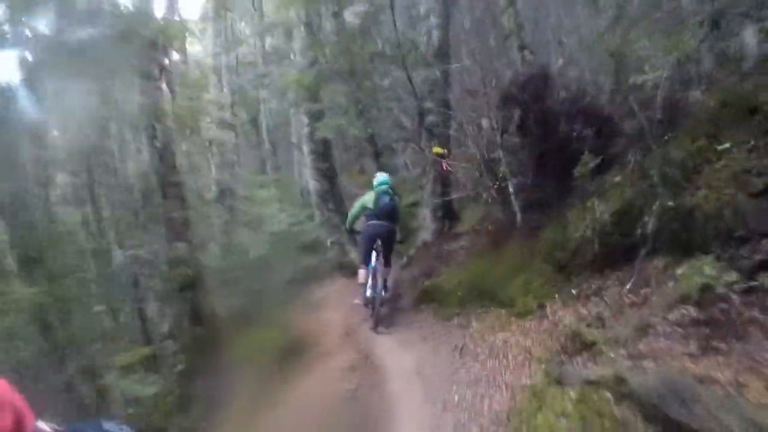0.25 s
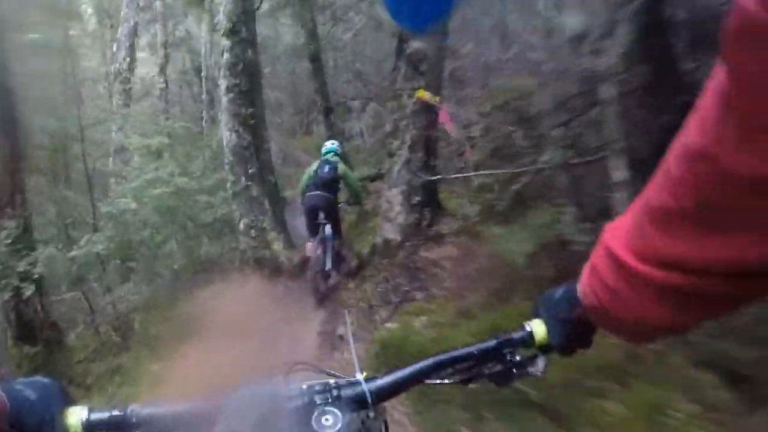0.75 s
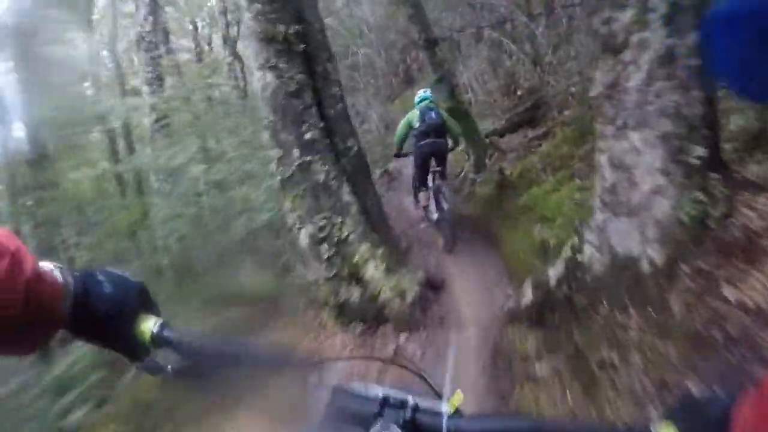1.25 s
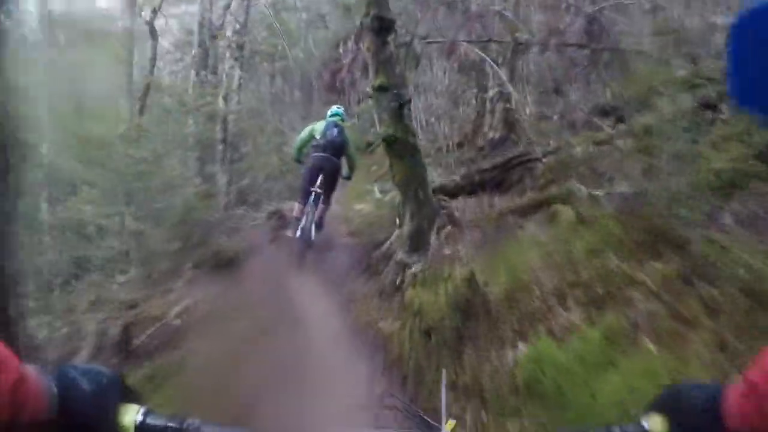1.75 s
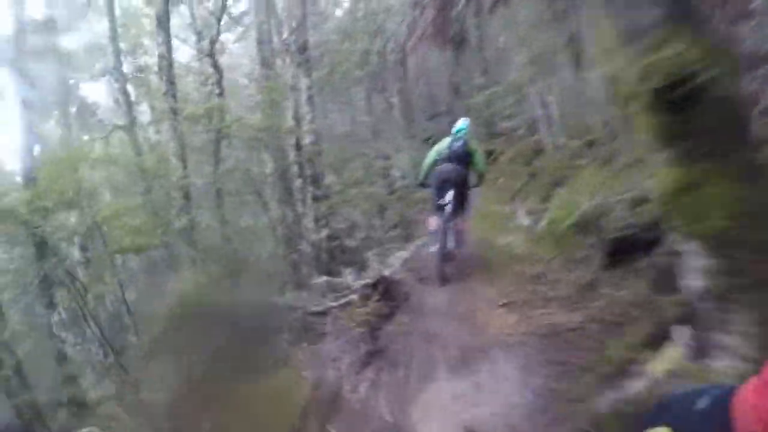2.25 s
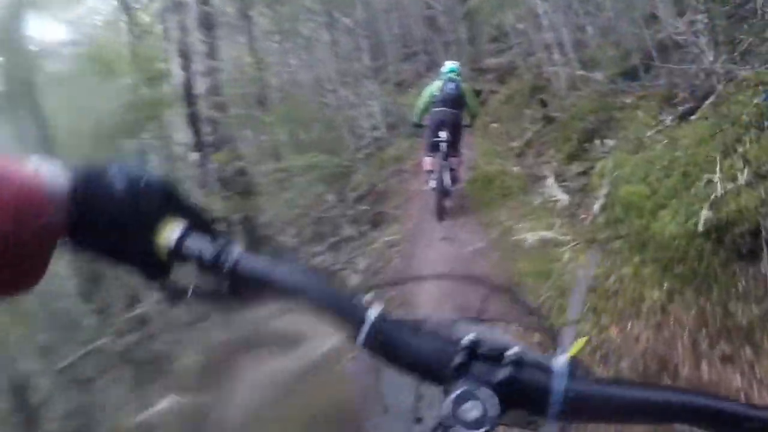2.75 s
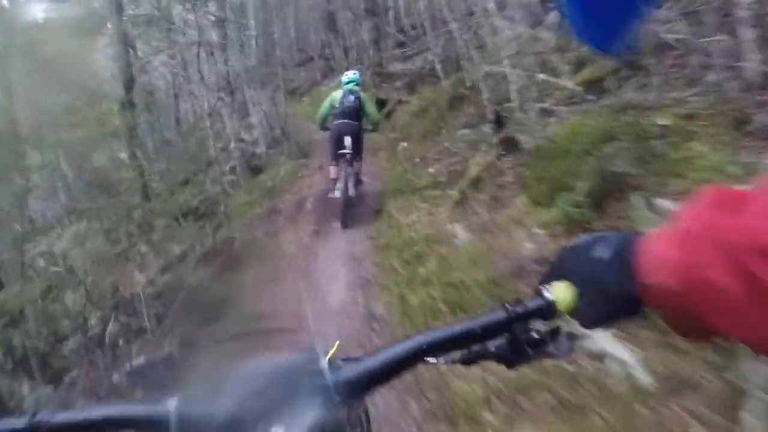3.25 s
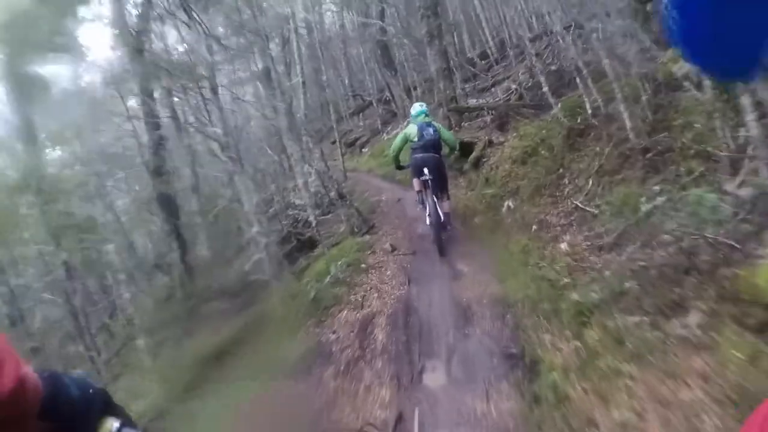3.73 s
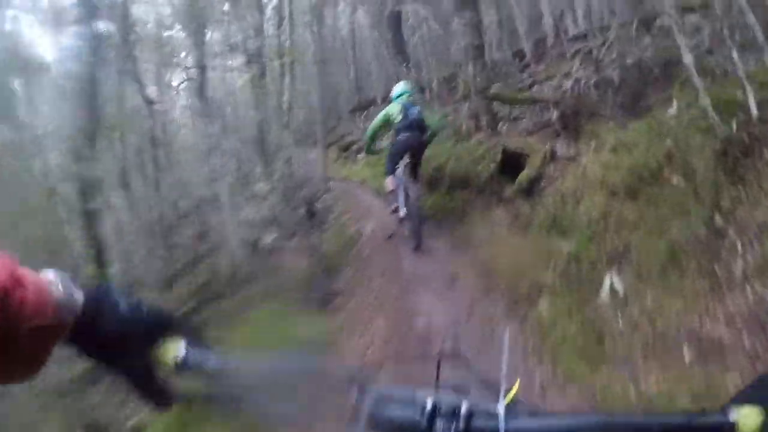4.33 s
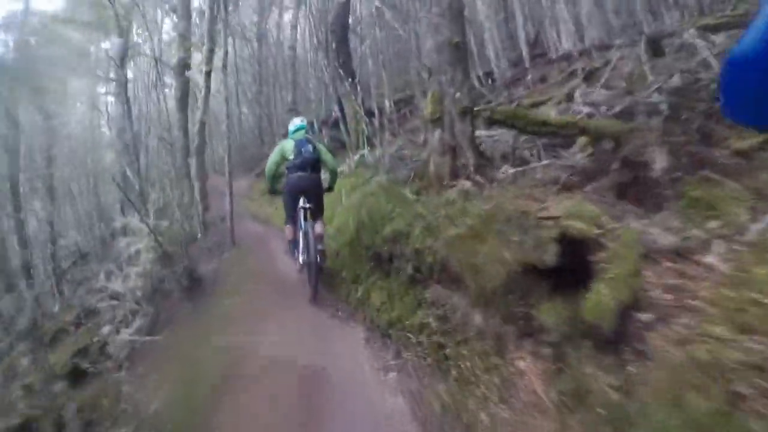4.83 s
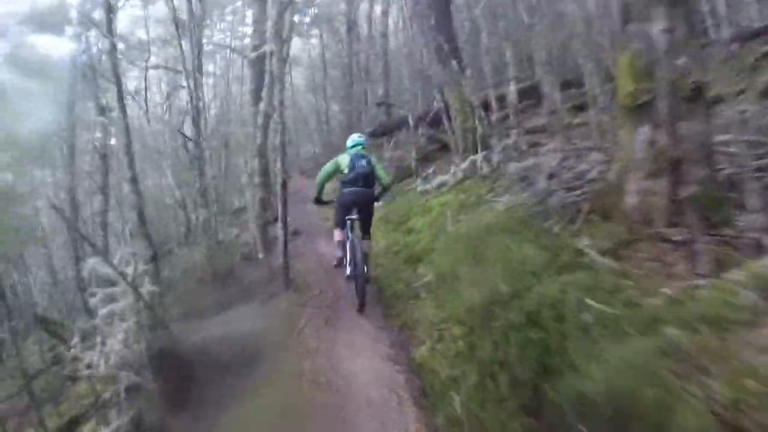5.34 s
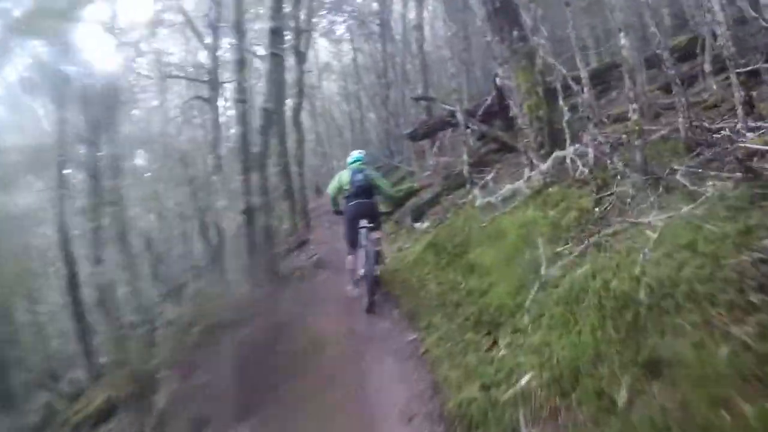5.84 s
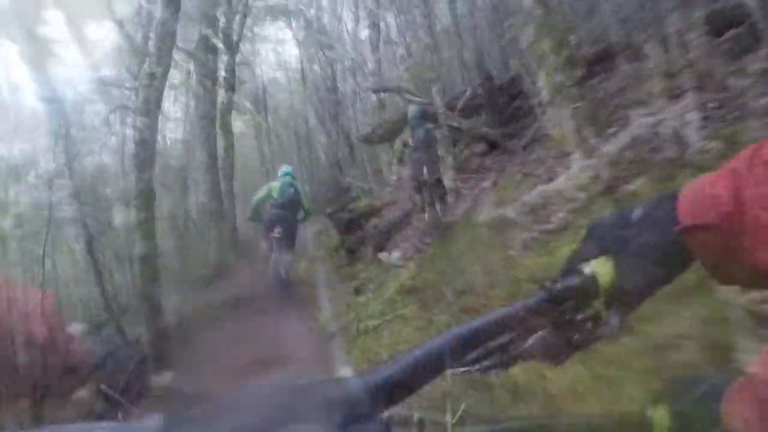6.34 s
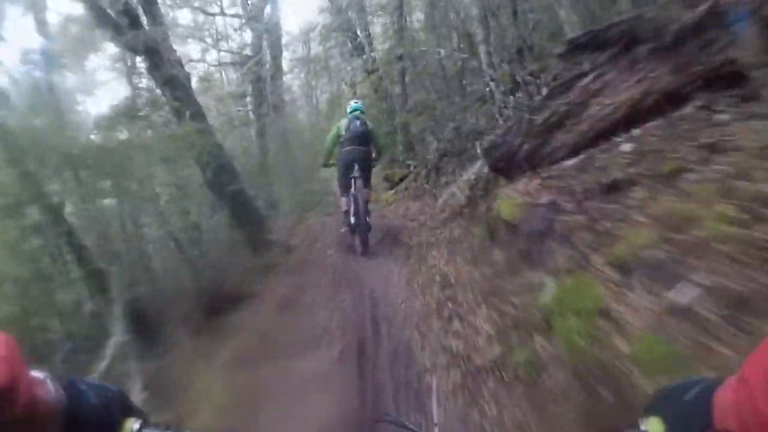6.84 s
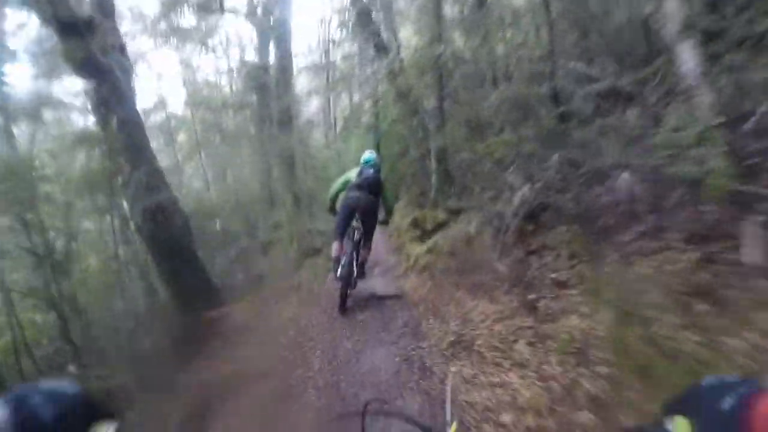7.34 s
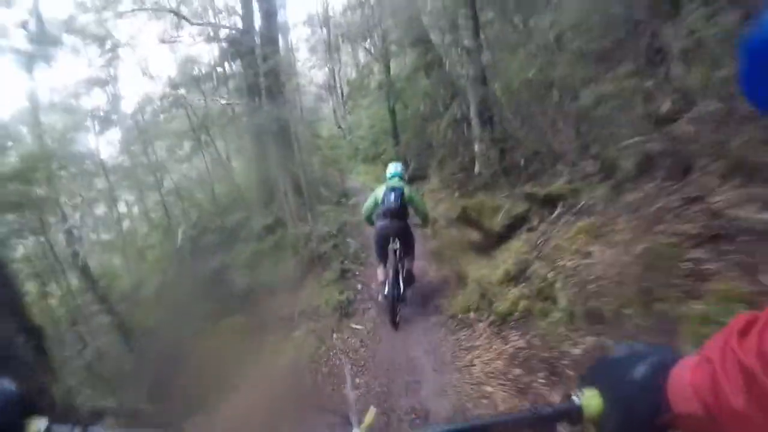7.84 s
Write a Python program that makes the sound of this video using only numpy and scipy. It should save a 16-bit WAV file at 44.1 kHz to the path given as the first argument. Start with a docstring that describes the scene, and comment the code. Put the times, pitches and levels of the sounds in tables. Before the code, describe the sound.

Bicycle disc brakes squeal in fluttering throbs for over a second, then wind buffets the microphone while tyres hiss and crunch along muddy forest trail.

```python
"""Both disc brakes of a bicycle squeal in throbs on a muddy forest trail, over hiss and crunch of tyres.
The camera rides on the rider, close to it all: wind buffets its ports, grit ticks, hard bumps thump, a rattle is faint.
It opens from one microphone to a stereo pair and later snaps back.
Squeals are sums of fluttering multiples of a slip rate; wind and tyres are coloured noise with moving levels;
ticks are filtered noise bursts, thumps short low sines, and the rattle is random knocks on ringing modes."""
import sys
import numpy as np
from scipy import signal
from scipy.fft import rfft, irfft, next_fast_len
from scipy.io import wavfile
from scipy.ndimage import uniform_filter1d, minimum_filter1d

SR = 44100
rng = np.random.default_rng(int(sys.argv[2]) if len(sys.argv) > 2 else 0)


def inscribe(sig):
    """Save sig as 16-bit PCM at rate SR to the path in sys.argv[1].

    A 1-D sig is mono; a 2-D sig holds one channel per row.
    Samples are clipped to [-1, 1] before scaling.
    """
    pcm = np.round(np.clip(np.atleast_2d(sig).T, -1, 1) * 32767)
    wavfile.write(sys.argv[1], SR, pcm.astype(np.int16))


N = 356328

# Loudest throbs, each one partial of a brake disc swelling and dying:
# (centre [s], width [s], mid frequency [Hz], glide from start to end [Hz], peak [dB])
BRAKE_THROBS = [(0.036, 0.032, 1105, 36, -18), (0.091, 0.02, 1080, -72, -14), (0.303, 0.025, 1070, 34, -19),
                (0.335, 0.018, 549, 3, -15.5), (0.392, 0.029, 1023, -60, -10),
                (0.652, 0.025, 1044, 3, -10.5), (0.692, 0.051, 514, 15, -14.5),
                (0.717, 0.029, 1054.0, 22, -9), (0.755, 0.025, 1054, 8, -13), (0.794, 0.037, 527, 1, -12.5),
                (0.785, 0.02, 1343, 18, -21.5), (0.823, 0.02, 1403, 53, -15.5),
                (0.862, 0.024, 1484, 90, -25), (0.898, 0.03, 1372, -8, -21),
                (0.838, 0.0434, 1042, -36, -11), (0.855, 0.017, 534, 3, -14),
                (0.902, 0.029, 532.6, 12, -15.0), (0.932, 0.028, 1098, 65, -12),
                (0.998, 0.058, 525, -3, -17), (1.002, 0.08, 1370, -5, -13),
                (1.056, 0.054, 1040, -10, -17.5), (1.142, 0.039, 1047, 11, -12),
                (1.214, 0.033, 1085, 60, -17), (1.225, 0.036, 2200, 170, -35)]
# First brake (two pulls), its rising release, and the second brake, one table each:
# (time [s], slip rate of the pads [Hz], level between throbs [dB], bite of the upper orders [dB])
BRAKE_PULLS = [
    [(0, 539.6, -31, -20), (.12, 522.4, -26.5, -5), (.28, 532, -31, -14), (.4, 521, -26, -7.5),
     (.46, 534, -27.5, -7), (.51, 540.3, -35.5, -29), (.59, 530, -30, -5), (.68, 523.2, -26, 4),
     (.9, 529.5, -27, -11), (1.02, 523.3, -28, -0.5), (1.17, 527.3, -27, -5), (1.23, 520, -53, -14)],
    [(1.18, 516, -25.5, -4), (1.245, 570, -38, -13), (1.275, 558, -28, -33), (1.31, 557, -41.5, -23),
     (1.46, 559, -49, -25)],
    [(.6, 681, -43, -12), (.75, 683, -30, -20), (1.0, 674, -28.5, -13), (1.2, 678, -30, -13),
     (1.33, 681, -43.5, -9), (1.62, 701, -46.5, -9), (1.72, 690, -51, -9)],
]
# Per squeal: (level of multiples 1, 2, 3 .. of the slip rate [dB])
SLIP_ORDERS = [
    [6, 1.5, -1, -17, -7.5, -14, -9.5, -9.5, -12, -17, -19.5, -22.5, -23.5],
    [3, 6.5, -21, 0],
    [4.5, 1, -17, -23],
]
# Per squeal: (first of the upper orders [multiple])
FIRST_UPPER_ORDER = [6, 4, 5]
# Per squeal: (depth of its flutter [factor])
FLUTTER_DEPTH = [0.67, 0.47, 0.48]
# Grit between pads and disc: (frequency [Hz], relative density [dB per Hz])
RASP_SPECTRUM = [(1800, -28), (3000, 3), (4500, 5), (6000, -13), (8000, -39)]
RASP_DB = -11  # against the squeal, before the bite
DRIFT_SHARE, DRIFT_PER_S = 0.007, 53  # slow drift of the slip rate

# Changing airflow at the left port between the short gusts, with one slow swell near 6 s;
# the left port is also the single microphone: (time [s], buffeting [dB])
AIRFLOW_LEFT = [(0.1, -27.5), (0.6, -29.5), (1.1, -29), (1.55, -26.5), (2.5, -24), (3.74, -21.5),
                (4.78, -31), (5.46, -24.5), (6.03, -9), (6.26, -19.5), (6.6, -27), (6.78, -27),
                (7.12, -25.5), (7.26, -23), (7.33, -29.5), (7.6, -37.5), (7.82, -23.5), (8.04, -26)]
# Airflow at the right port: (time [s], buffeting [dB])
AIRFLOW_RIGHT = [(1.58, -20), (1.94, -24), (2.24, -41), (2.32, -23), (2.78, -24), (2.96, -17.5),
                 (3.32, -42), (3.96, -19.5), (4.58, -46), (4.68, -15.5), (4.78, -36), (5.48, -33),
                 (5.58, -20), (5.84, -25.5), (6.46, -23)]
# Slow deep pressure swings at both ports: (time [s], level [dB])
PRESSURE_SWAY = [(0, -20), (.3, -23.5), (1, -25), (2, -23.5), (7.27, -28), (7.33, -51), (7.62, -27),
                 (7.72, -16.5), (8, -24)]
# Short gusts at the left port: (start [s], hold [s], buffeting [dB], rush above the buffeting [dB],
# sag of the rush [dB per s])
WIND_GUSTS = [(1.745, 0.53, -15.5, -1, 19), (2.62, 0.3, -21, -17, 28), (2.93, 0.61, -13.5, 2, 15.5),
              (3.755, 0.17, -20, -3, 4), (4.082, 0.5, -12.5, 2, 8.5), (4.831, 0.086, -16.5, -10, 15),
              (5.052, 0.26, -15.5, -9, 28), (6.265, 0.099, -15.5, -1.5, 1), (6.854, 0.039, -16, -10.5, 3),
              (7.416, 0.065, -23.5, -14, 0), (7.85, 0.1, -27.5, -1, 18)]
# Low buffeting of the ports: (frequency [Hz], relative density [dB per Hz])
BUFFET_SPECTRUM = [(20, -0.5), (45, -9), (75, 3), (125, 1), (200, -5.5), (310, -15), (1500, -99)]
# Higher rush of air over the ports: (frequency [Hz], relative density [dB per Hz])
RUSH_SPECTRUM = [(60, -72), (150, -6.5), (250, 0.5), (450, -7.5), (800, -23.5), (1200, -34), (4000, -84)]
LEFT_RUSH_DB, RIGHT_RUSH_DB = -16.5, -9.5  # against the buffeting: left between gusts, right
GUST_RISE_S, GUST_FALL_DB_PER_S = 0.042, 186
GUST_SAG_DB_PER_S = -1  # negative: held buffeting grows

# Rolling between the splashes:
# (time [s], hiss of the tread in wet mud [dB], crunch of loose ground above the hiss [dB])
ROLLING = [(0.02, -38, 5.5), (0.22, -46, 13), (0.44, -39, 2.5), (0.92, -40.5, 0), (1.24, -38.5, 1.5),
           (1.5, -32.5, -7.5), (2.12, -33.5, -8), (2.36, -37, -1), (3.1, -38, 1), (3.74, -34.5, -11),
           (4.16, -37, 1), (4.62, -37, -9), (4.98, -33.5, -6.5), (5.42, -35, -6.5), (5.9, -33, -5.5),
           (6.5, -39.5, -5), (7.06, -29, -2), (7.38, -38, -1.5), (8.06, -34.5, -1)]
# Tyres splash through wet patches and grind over loose ones: (start [s], hold [s], hiss [dB], crunch [dB])
WET_AND_LOOSE_PATCHES = [(0.093, 0.024, -32, -32.5), (0.562, 0.21, -35.5, -36), (0.99, 0.066, -39, -40),
                         (2.456, 0.26, -28.5, -57), (2.752, 0.11, -24.5, -48), (3.29, 0.13, -29, -51),
                         (3.76, 0.18, -42, -33), (4.077, .01, -34.5, -33.5), (4.283, 0.14, -31, -62),
                         (4.638, 0.0082, -39, -37), (5.929, 0.089, -30.5, -36.5), (6.141, 0.31, -29, -36),
                         (7.633, 0.03, -36, -42), (7.924, 0.026, -53, -39)]
# Crunch of loose ground: (frequency [Hz], relative density [dB per Hz])
CRUNCH_SPECTRUM = [(300, 9.5), (1150, 4), (1650, 2.5), (2500, 1.5), (3300, 0), (6000, -28.5)]
# Hiss through the single microphone: (frequency [Hz], relative density [dB per Hz])
HISS_ONE_MIC = [(1500, -17), (2890, -15.5), (4090, 3.5), (5850, 2.5), (7370, -9), (8900, -14.5),
                (10900, -31), (12800, -18), (15300, -32)]
# Hiss through the stereo pair: (frequency [Hz], relative density [dB per Hz])
HISS_STEREO = [(1500, -21), (3300, -4.5), (4700, -4.5), (6300, 2.5), (7580, -5), (8510, -12),
               (11500, -21.5), (15300, -33)]
# Tyre sound at the two ports: (frequency [Hz], left-right likeness [0 to 1], lead of the left [radians])
PORT_LIKENESS = [(900, .3, 0), (2500, .72, 0), (4200, .82, .2), (6000, .55, 1.1), (8000, .48, 1.7),
                 (10000, .1, 2.5)]
# Changing level of the treble above TREBLE_HZ, some values below zero: (time [s], change [dB])
TREBLE_CHANGE = [(0, 1), (1.0, 4), (1.7, 7), (2.0, 7), (2.9, 0), (3.2, -2), (5.6, -2), (6.0, -1), (6.7, 4),
                 (7.0, 7.5), (7.4, 6), (8, 3)]
TREBLE_HZ = 11500
SPLASH_RISE_S, SPLASH_FALL_DB_PER_S, SPLASH_SAG_DB_PER_S = 0.015, 111, 5
FRAME = 512  # samples in one short-time spectrum

# Grit and twigs tick on frame and camera: (time [s], peak [dB], nominal pitch [Hz])
GRIT_TICKS = [(.185, -33, 7000), (.99, -33, 6500), (1.387, -18, 2240), (1.628, -15, 2620),
              (2.311, -18.5, 2100), (2.746, -23, 6440), (3.013, -22, 2430), (3.114, -16.5, 1170),
              (3.37, -29, 5920), (3.768, -24, 2540), (3.842, -11, 2820), (4.188, -29, 5850),
              (4.215, -18, 1100), (4.709, -13.5, 5700), (4.72, -7, 5000), (5.281, -17, 2040),
              (5.567, -22.5, 2000), (5.864, -22, 4000), (5.903, -24, 4530), (5.94, -22, 6000),
              (6.438, -12.5, 2820), (7.617, -18.5, 3040), (7.761, -19.5, 3980), (7.964, -19, 2290)]
# Hard gusts and bumps felt by both ports: (time [s], peak [dB], frequency [Hz])
LOW_THUMPS = [(2.313, -14.5, 112), (3.106, -12, 173), (3.68, -19.5, 262), (3.842, -9, 237),
              (4.699, -16.5, 268), (6.416, -15, 189), (6.83, -6.5, 93), (6.913, -8.5, 170),
              (7.507, -15.5, 158), (7.798, -11, 65.5), (7.899, -10, 99)]
# Something loose on the frame over rough ground: (start [s], length [s], middle mode [Hz], level [dB])
FRAME_RATTLES = [(3.755, 0.21, 2700, -39.5), (5.377, 0.48, 3050, -41.5), (7.886, .2, 2380, -42.5)]
KNOCKS_PER_S, KNOCK_T60_S, MODE_SPACING = 500, .01, .1  # spacing as a share of the middle mode

# The camera opens and closes its stereo: (time [s], share of the pair [0 to 1])
STEREO_SHARE = [(1.6, 0), (1.78, 1), (6.452, 1), (6.46, 0)]
EDGE_HZ = 15400  # upper band limit of the camera


def gain_of(db):
    """Decibels to a factor."""
    return 10 ** (np.asarray(db) / 20)


def evened(x):
    """Scales to rms 1."""
    return x / np.sqrt(np.mean(abs(x) ** 2) + 1e-20)


def columns(rows, t):
    """Every column of a table, interpolated at the times t."""
    s, *rest = np.transpose(rows)
    return [np.interp(t, s, c) for c in rest]


def colour(points, hz):
    """Every column of a spectrum, interpolated over log frequency."""
    log_points = [(np.log(p[0]), *p[1:]) for p in points]
    return columns(log_points, np.log(hz + 1))


def wander(per_s, count=N):
    """Smooth chance of rms 1 that turns about per_s times a second."""
    size = int(SR / per_s)
    smooth = uniform_filter1d(rng.standard_normal(count), size)
    return evened(uniform_filter1d(smooth, size))


def noise(points, count=N):
    """Steady noise of rms 1 with the given spectrum."""
    size = next_fast_len(count, real=True)
    db = colour(points, np.fft.rfftfreq(size, 1 / SR))[0]
    shaped = rfft(rng.standard_normal(size)) * gain_of(db)
    return evened(irfft(shaped, size)[:count])


def mix_in(mix, s, sound):
    """Mixes a sound in from second s."""
    part = mix[..., max(round(s * SR), 0):][..., :sound.shape[-1]]
    part += sound[..., :part.shape[-1]]


def swells(t, base_db, starts, holds, tops_db, rise_s, fall_db_per_s, sag_db_per_s):
    """Adds to a base level the power of events that rise, sag while held, then fall; in dB."""
    power = gain_of(2 * base_db)
    for start, hold, top_db, sag in np.broadcast(starts, holds, tops_db, sag_db_per_s):
        since = np.maximum(t - start - rise_s, 0)
        db = top_db - sag * np.minimum(since, hold) - fall_db_per_s * np.maximum(since - hold, 0)
        rise = np.clip((t - start) / rise_s, 0, 1)
        power = power + (rise * gain_of(db)) ** 2
    return 10 * np.log10(power)


def squeal(rows, orders_db, first_upper, depth):
    """Pads stick and slip unevenly; every order flutters on its own, the lowest least."""
    t = np.arange(rows[0][0], rows[-1][0], 1 / SR)
    count = len(t)
    slip_hz, level_db, bite_db = columns(rows, t)
    jitter = 0.00624 * wander(225, count)
    drift = DRIFT_SHARE * wander(DRIFT_PER_S, count)
    turns = np.cumsum(slip_hz * (1 + jitter + drift)) / SR
    out = np.zeros(count)
    for k, db in enumerate(orders_db, start=1):
        # complex, so that strength and phase both flutter
        chance = wander(91, count) + 1j * wander(95, count)
        flutter = 0.73 + depth * min(k, 3) / 2 * chance
        order_db = db + bite_db * (k >= first_upper)
        out += gain_of(order_db) * (flutter * np.exp(2j * np.pi * k * turns)).real
    puffs = 1 + np.cos(2 * np.pi * turns)  # one puff of rasp per slip
    out += gain_of(RASP_DB + bite_db) * noise(RASP_SPECTRUM, count) * puffs
    return gain_of(level_db) * out * signal.windows.tukey(count, .04)


def throb(width, hz, glide, db):
    """One disc partial swells and dies while its pitch glides evenly through hz."""
    t = np.arange(0, 2.2 * width, 1 / SR)
    turns = hz * t + glide / 2 * t * (t / t[-1] - 1)
    start = rng.random()  # random starting phase, in turns
    return gain_of(db) * np.hanning(len(t)) * np.sin(2 * np.pi * (turns + start))


def brakes():
    """Stick-slip squeals of both disc brakes, with the throbs of the discs on top."""
    out = np.zeros(N)
    for rows, *voice in zip(BRAKE_PULLS, SLIP_ORDERS, FIRST_UPPER_ORDER, FLUTTER_DEPTH):
        mix_in(out, rows[0][0], squeal(rows, *voice))
    for centre, width, *tone in BRAKE_THROBS:
        mix_in(out, centre - 1.1 * width, throb(width, *tone))
    return out


def wind():
    """Lumpy eddies, unrelated at each port; the pair's matrix leaks the left rush upside down into the right."""
    t = np.arange(N) / SR
    air_db, right_db, sway_db = (columns(rows, t)[0] for rows in (AIRFLOW_LEFT, AIRFLOW_RIGHT, PRESSURE_SWAY))
    start, hold, gust_db, above_db, rush_sag = np.transpose(WIND_GUSTS)
    left_db = swells(t, air_db, start, hold, gust_db, GUST_RISE_S, GUST_FALL_DB_PER_S, GUST_SAG_DB_PER_S)
    rush_db = swells(t, air_db + LEFT_RUSH_DB, start, hold, gust_db + above_db,
                     GUST_RISE_S, GUST_FALL_DB_PER_S, rush_sag)
    left_lumps_db, right_lumps_db = 1.7 * wander(35), 1.25 * wander(25)
    left = gain_of(left_db + left_lumps_db) * noise(BUFFET_SPECTRUM)
    right = gain_of(right_db + right_lumps_db) * noise(BUFFET_SPECTRUM)
    rush = gain_of(rush_db + left_lumps_db + 3.47 * wander(104)) * noise(RUSH_SPECTRUM)
    right_rush = gain_of(right_db + right_lumps_db + RIGHT_RUSH_DB) * noise(RUSH_SPECTRUM)
    deep = [(14, 0.5), (60, -2.5), (200, -74)]  # (frequency [Hz], relative density [dB per Hz])
    sway = [gain_of(sway_db) * noise(deep) for port in "LR"]
    return np.array([left + rush, right + right_rush - 0.31 * rush]) + sway


def tyres():
    """Random short-time spectra with patches and wide flicker, broken up by a spray of fine grains."""
    hop = FRAME // 4
    overlap = FRAME - hop
    frames, hz = N // hop + 5, np.fft.rfftfreq(FRAME, 1 / SR)
    t = np.arange(frames) * hop / SR
    a, b, c, d, patches = rng.standard_normal((frames, len(hz), 5)).T
    # patches span neighbouring bands and frames; flicker moves all bands together
    patches = evened(uniform_filter1d(uniform_filter1d(patches, 9, axis=0), 14, axis=1))
    flicker = evened(uniform_filter1d(rng.standard_normal((2, frames)), 9))

    roll_db, loose_db = columns(ROLLING, t)
    start, hold, wet_db, grind_db = np.transpose(WET_AND_LOOSE_PATCHES)
    shape = SPLASH_RISE_S, SPLASH_FALL_DB_PER_S, SPLASH_SAG_DB_PER_S
    hiss_db = swells(t, roll_db, start, hold, wet_db, *shape)
    crunch_db = swells(t, roll_db + loose_db, start, hold, grind_db, *shape) - hiss_db  # above the hiss

    width = columns(STEREO_SHARE, t)[0]
    spectra = HISS_ONE_MIC, HISS_STEREO, CRUNCH_SPECTRUM
    one, pair, crunch = (evened(gain_of(colour(p, hz)[0]))[:, None] for p in spectra)
    hiss = ((1 - width) * one + width * pair) * gain_of(1.83 * flicker[0])
    crunch = crunch * gain_of(crunch_db + 2.3 * flicker[1] + 0.4 * flicker[0])
    size = np.hypot(hiss, crunch)

    # the right port hears a delayed share of the left and a share of its own
    same, lead = (v[:, None] for v in colour(PORT_LIKENESS, hz))
    left, own = a + 1j * b, c + 1j * d
    right = same * left * np.exp(-1j * lead) + np.sqrt(1 - same ** 2) * own
    treble_db = np.outer(hz > TREBLE_HZ, columns(TREBLE_CHANGE, t)[0])
    ports = np.array([left, right]) * size * gain_of(hiss_db + treble_db + 1.62 * patches)
    unit = np.std(signal.istft(left, nperseg=FRAME, noverlap=overlap)[1])
    sound = signal.istft(ports, nperseg=FRAME, noverlap=overlap)[1][:, :N]
    grains = gain_of(1.6 * wander(380))  # mud flung off the knobs in millisecond spurts
    return grains * sound / unit


def ticks():
    """A short burst of noise in a band around one pitch, dying fast."""
    out, t = np.zeros(N), np.arange(3000) / SR
    envelope = gain_of(-60 * t / 0.017) * np.minimum(t / 0.001, 1)  # 1 ms rise, 60 dB down in 17 ms
    for s, db, hz in GRIT_TICKS:
        band = signal.butter(N=3, Wn=[hz / 5.5, min(hz * 1.61, 9500)], btype="band", fs=SR)
        tick = signal.lfilter(*band, rng.standard_normal(len(t)) * envelope)
        mix_in(out, s, gain_of(db) * tick / abs(tick).max())
    return out


def thumps():
    """A gust or bump swings both ports through 2.6 low cycles."""
    out = np.zeros(N)
    for s, db, hz in LOW_THUMPS:
        turns = np.arange(0, 2.6, hz / SR)
        mix_in(out, s, gain_of(db) * np.sin(2 * np.pi * turns) * signal.windows.tukey(len(turns), .6))
    return out


def rattles():
    """Uneven random knocks each ring one of three close, short modes."""
    out, t = np.zeros(N), np.arange(2000) / SR
    for s, length, hz, db in FRAME_RATTLES:
        chance, size, which = rng.random((int(length * SR), 3)).T
        knocks = (chance < KNOCKS_PER_S / SR) * (0.15 + size) ** 2
        sound = 0
        for k in (-1, 0, 1):
            mode_hz = hz * (1 + MODE_SPACING * k)
            ring = gain_of(-60 * t / KNOCK_T60_S) * np.sin(2 * np.pi * mode_hz * t)
            sound = sound + signal.oaconvolve(knocks * (np.floor(3 * which) == k + 1), ring)
        mix_in(out, s, gain_of(db) * evened(sound))
    return out


def scene():
    """All sources at the two ports."""
    return brakes() + wind() + tyres() + ticks() + thumps() + rattles()


def record(dry):
    """Without the pair the left signal feeds both sides, save the top octave; peak limiter; band limit."""
    left, right = dry
    width = columns(STEREO_SHARE, np.arange(N) / SR)[0]
    apart = right - left
    high = signal.butter(N=8, Wn=11800, btype="high", fs=SR, output="sos")
    top = signal.sosfiltfilt(high, apart)
    pair = np.array([left, left + width * apart + (1 - width) * top])
    peak = -minimum_filter1d(-abs(pair).max(0), size=301)  # highest peak nearby
    pair = pair * uniform_filter1d(np.minimum(.92 / peak, 1), size=301)
    low = signal.firwin(511, EDGE_HZ, window=("kaiser", 9), fs=SR)
    return signal.oaconvolve(pair, low[None], "same")


dry = scene()
out = record(dry)
inscribe(out)
```